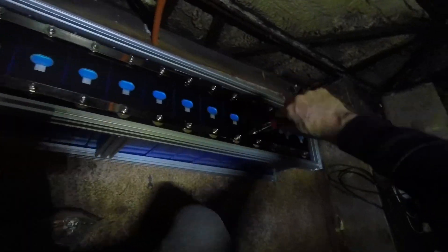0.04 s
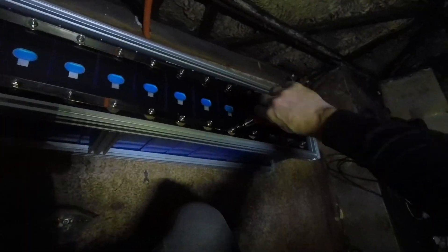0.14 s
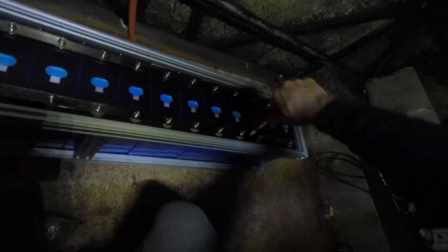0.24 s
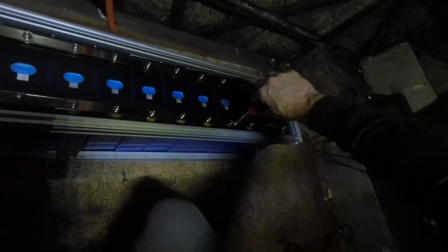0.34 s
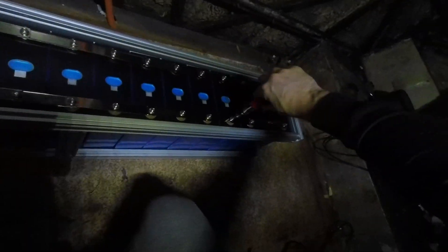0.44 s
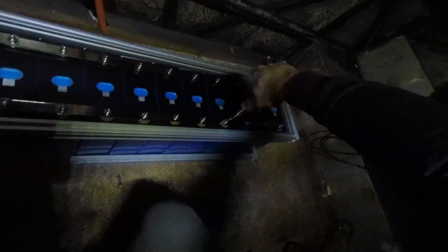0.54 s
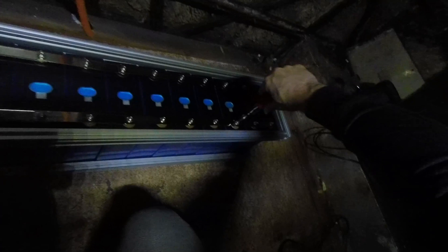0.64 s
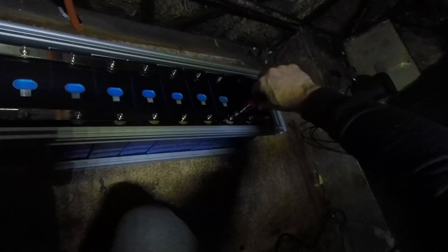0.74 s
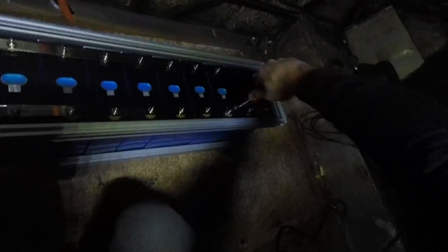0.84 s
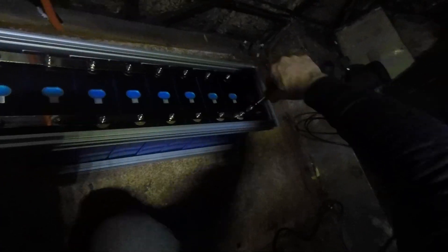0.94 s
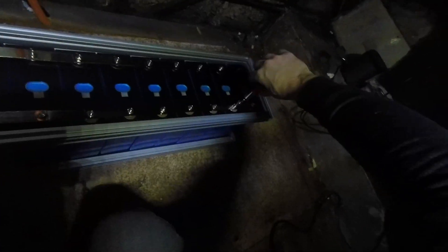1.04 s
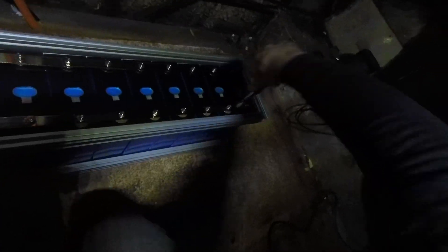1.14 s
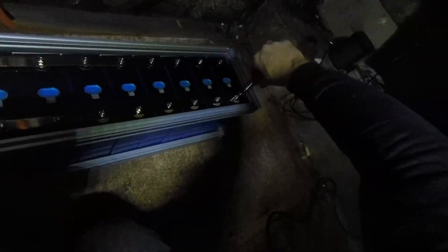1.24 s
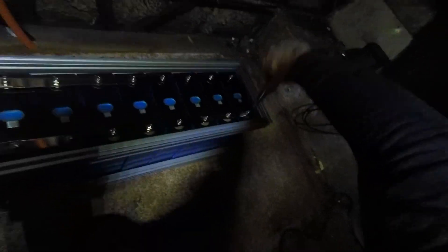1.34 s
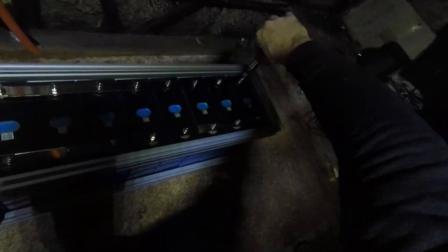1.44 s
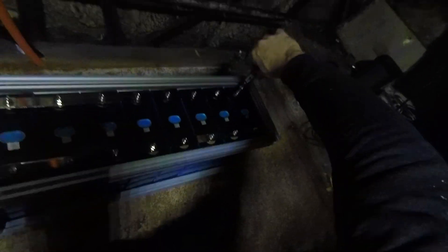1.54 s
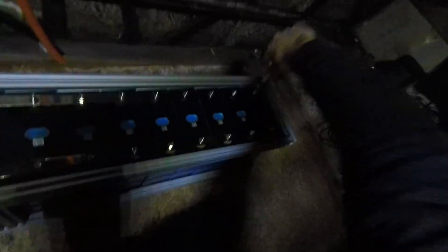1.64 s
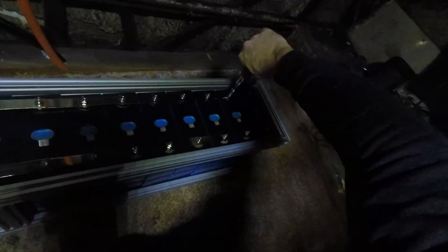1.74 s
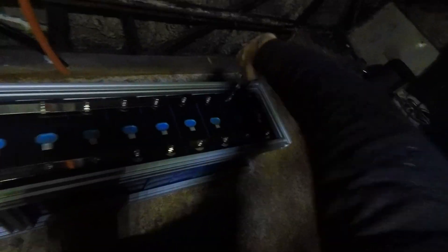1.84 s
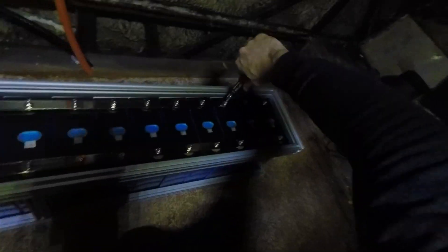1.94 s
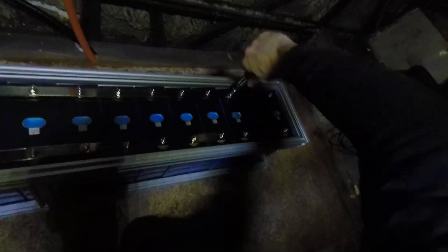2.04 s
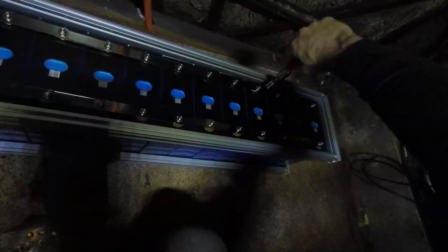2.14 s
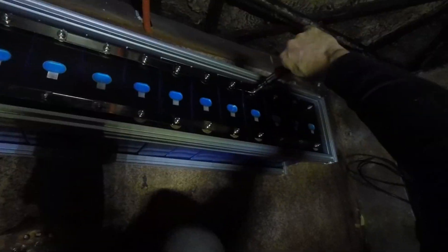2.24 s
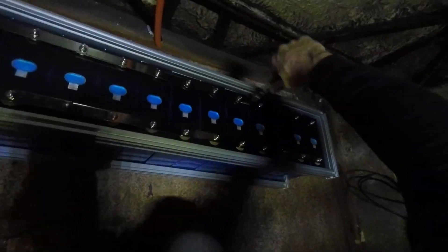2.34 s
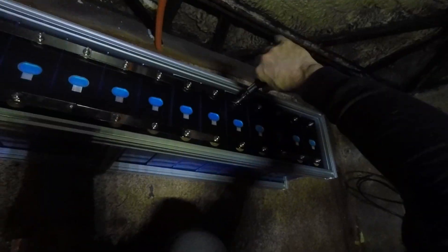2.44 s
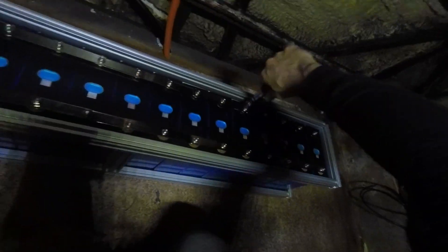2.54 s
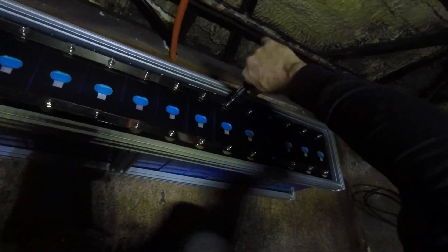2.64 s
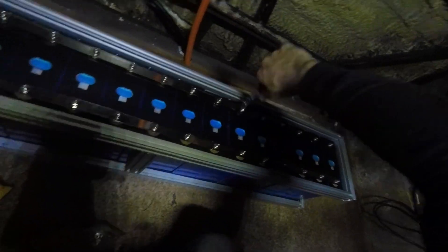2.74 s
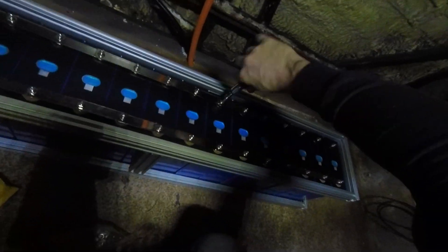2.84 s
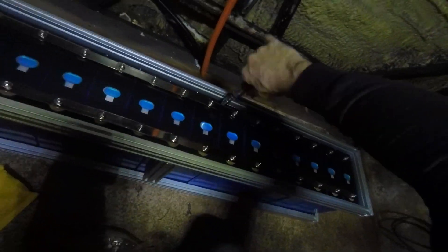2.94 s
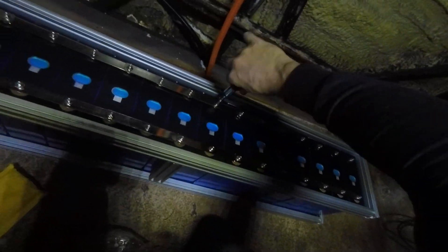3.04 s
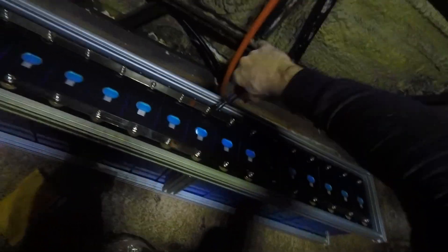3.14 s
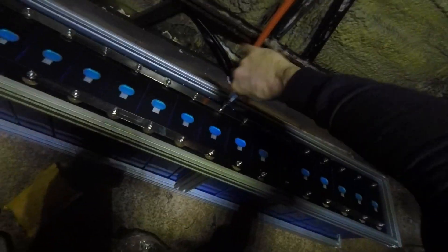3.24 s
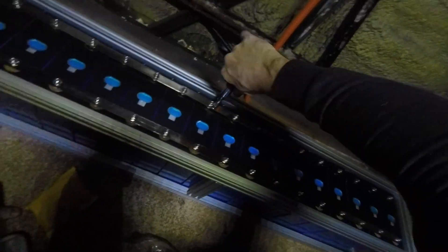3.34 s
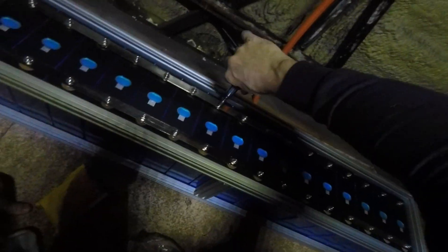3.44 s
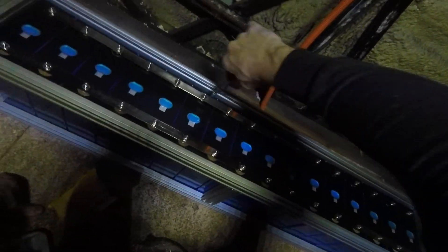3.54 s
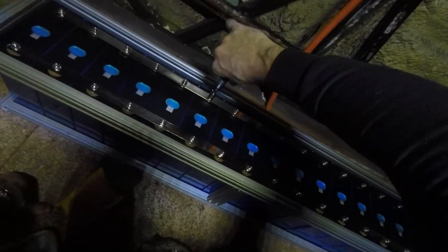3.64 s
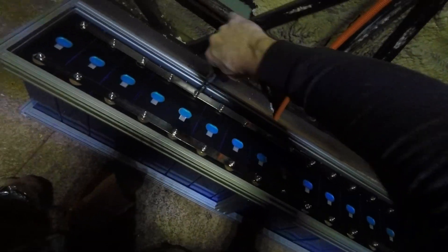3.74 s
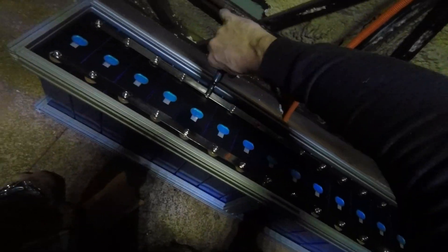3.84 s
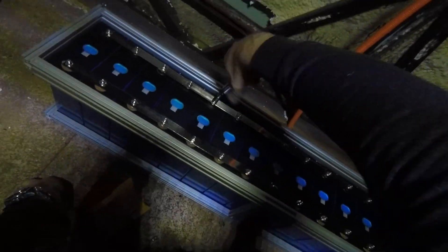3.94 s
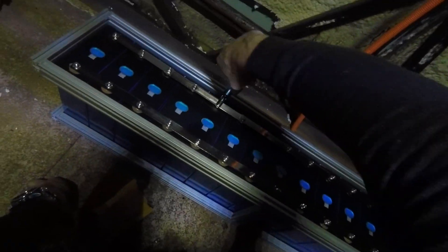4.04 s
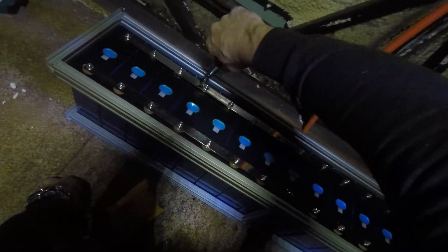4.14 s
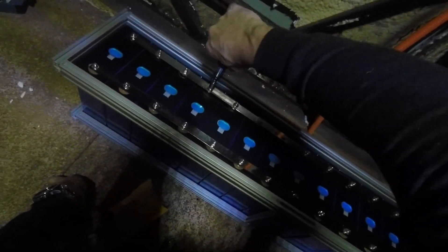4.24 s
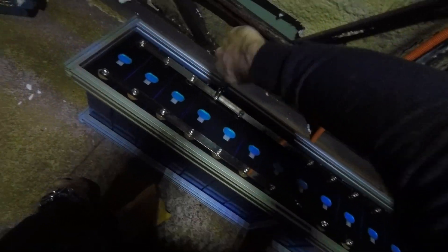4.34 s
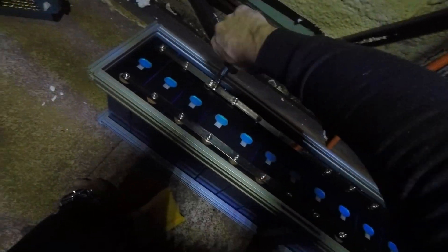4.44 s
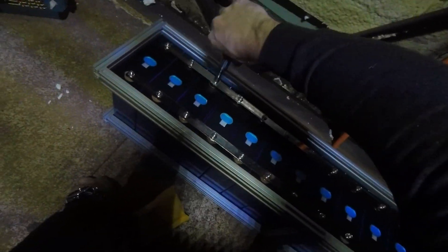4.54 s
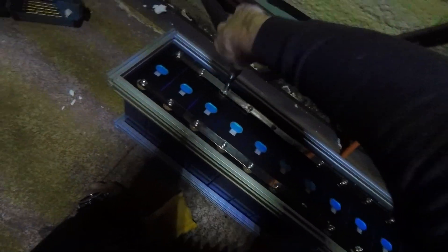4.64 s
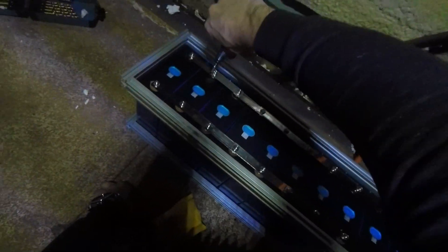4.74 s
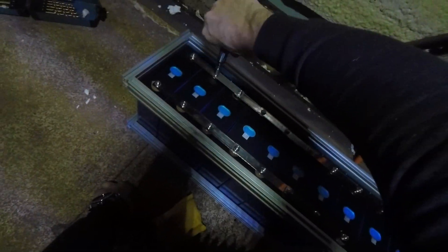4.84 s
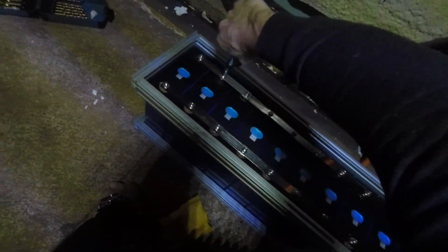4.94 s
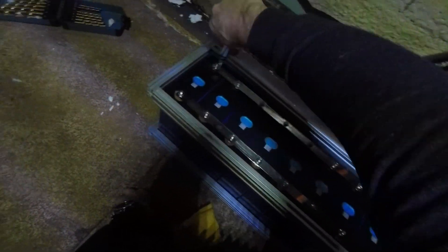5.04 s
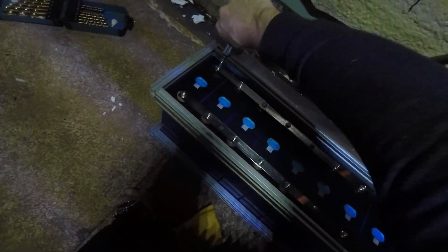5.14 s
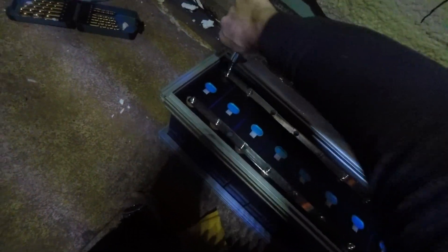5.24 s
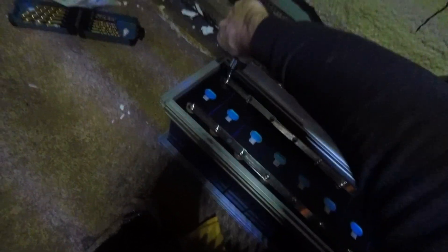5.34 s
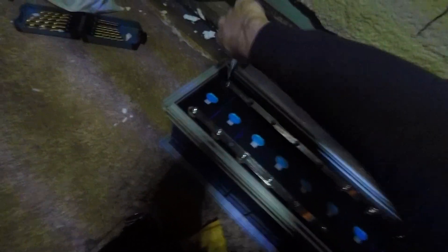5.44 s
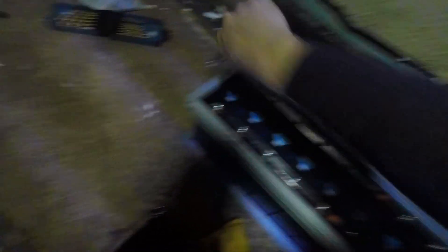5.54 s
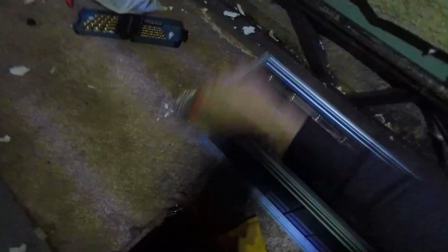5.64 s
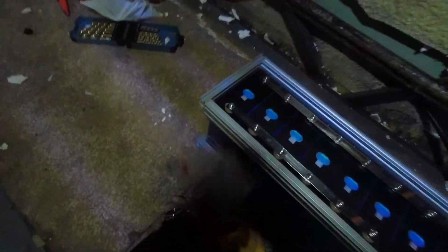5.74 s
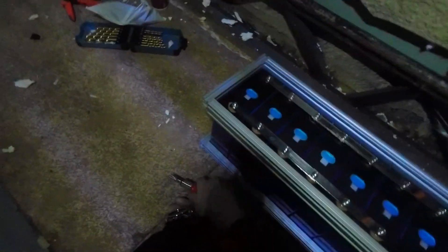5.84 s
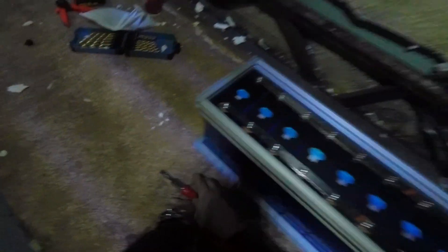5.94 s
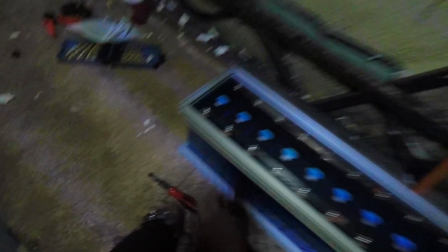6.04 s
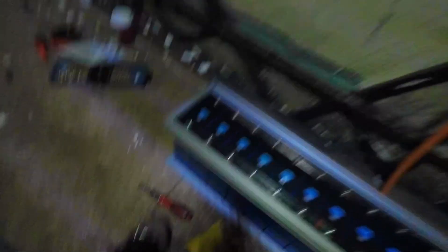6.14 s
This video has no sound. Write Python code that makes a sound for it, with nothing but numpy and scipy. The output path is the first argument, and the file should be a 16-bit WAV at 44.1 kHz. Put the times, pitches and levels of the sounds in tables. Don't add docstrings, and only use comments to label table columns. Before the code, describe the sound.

Outdoors at night, with a close body-worn microphone that sounds thin and dry, steel ticks and rattles in irregular clusters as a ratchet swings back and forth, with sharper snaps about twice a second. A brief stuttering creak comes early and a sleeve brushes faintly later. Thudding pulls follow, then a near pause with fuller, darker air, and one very loud hollow bang with a rocking, short rumble.

```python
import sys
import numpy as np
from scipy import signal
from scipy.fft import rfft, irfft
from scipy.io import wavfile

SR = 44100
rng = np.random.default_rng(int(sys.argv[2]) if len(sys.argv) > 2 else 0)


def store_wav(level_fs):
    pcm = np.round(np.clip(np.atleast_2d(level_fs), -1, 1) * 32767)
    wavfile.write(sys.argv[1], SR, pcm.T.astype(np.int16))


def linear_from_db(decibels):
    return 10 ** (np.asarray(decibels, float) / 20)


N = 273670
TIME_S = np.arange(N) / SR


def rms_one(x):
    return x / np.sqrt(np.mean(x ** 2) + 1e-20)


def band(x, low_hz, high_hz):
    limits = [low_hz, min(high_hz, 0.45 * SR)]
    return signal.sosfilt(signal.butter(2, limits, "band", fs=SR, output="sos"), x)


def lowpass(x, order, top_hz):
    return signal.sosfilt(signal.butter(order, top_hz, fs=SR, output="sos"), x)


def noise(spectrum):
    hz, db = np.transpose(spectrum)
    log_hz = np.log(np.fft.rfftfreq(N, 1 / SR) + 1)
    level_db = np.interp(log_hz, np.log(hz), db)
    level_db = level_db - 600 * np.maximum(log_hz - np.log(hz[-1]), 0)
    return rms_one(irfft(rfft(rng.standard_normal(N)) * linear_from_db(level_db), N))


def drift(rate_hz):
    r = np.exp(-2 * np.pi * rate_hz / SR)
    wander = signal.lfilter([1], [1, -2 * r, r * r], rng.standard_normal(N + SR))
    return rms_one(wander[SR:])


def strike(times, level_db, modes, spread_db, touch_s=0.0, after_db=-54.0, after_s=0.005,
           turning=None, firm=False):
    at = (np.asarray(times) * SR).astype(int)
    luck = rng.standard_normal((len(at), len(modes)))
    grit = rng.choice([-1.0, 1.0], N + len(modes))
    if firm:
        push = np.arange(int(5 * touch_s * SR) + len(modes))
        grit[np.add.outer(at, push)] = 1

    quick = np.exp(-1 / (touch_s * SR + 1e-9))
    slow = np.exp(-1 / (after_s * SR))
    rise = np.convolve([1, -quick], [1, -quick])
    burst = np.sqrt((1 - quick ** 2) ** 3 / (1 + quick ** 2))
    rattle = linear_from_db(after_db) * np.sqrt(1 - slow ** 2)
    force_top = burst * np.array([1, -slow, 0]) + rattle * rise
    force_bottom = np.convolve(rise, [1, -slow])

    out = np.zeros(N)
    for k, (hz, mode_db, t60) in enumerate(modes):
        hit_db = level_db + mode_db + spread_db * luck[:, k]
        if turning:
            hit_db = hit_db + turning(times, hz)
        clicks = np.full(N, 1e-18)
        np.add.at(clicks, at, linear_from_db(hit_db))
        force = signal.lfilter(force_top, force_bottom, clicks)
        if touch_s:
            force = force * grit[k:k + N]
        r = linear_from_db(-60 / (t60 * SR))
        w = 2 * np.pi * hz / SR
        out += signal.lfilter([0, np.sin(w)], [1, -2 * r * np.cos(w), r * r], force)
    return out


def scatter(x, t60, start_s):
    t = np.arange(int(0.15 * SR)) / SR
    tail = rng.standard_normal(len(t)) * linear_from_db(-60 * t / t60) * (t > start_s)
    return signal.fftconvolve(x, tail / np.sqrt(np.sum(tail ** 2)))[:N]


def second_mic_share():
    return np.clip((TIME_S - 5.267) / 0.003, 0, 1)


# f/Hz, level/dB
HANDLING_COLOUR = [(410, -22), (700, -3), (758, -9.5), (851, -6.5), (1850, -16), (3000, -22.5), (3900, -52),
                   (6600, -120)]
# f/Hz, level/dB
FIRST_AIR_COLOUR = [(1200, -17), (2000, -27), (3200, -1.5), (4500, -2.5), (9400, -6.5), (12800, -12),
                    (15000, -12), (15800, -21)]
# f/Hz, level/dB
OPEN_AIR_COLOUR = [(30, -6), (150, 0), (400, -6), (650, -13), (2200, -20), (4300, -32), (7000, -21),
                   (14800, -28)]


def night():
    handling = linear_from_db(-49.5 + 2.0 * drift(22)) * noise(HANDLING_COLOUR)
    air = linear_from_db(-57.5 + 0.25 * drift(3.4) + 0.85 * drift(55)) * noise(FIRST_AIR_COLOUR)
    open_air = linear_from_db(-46 + 1.5 * drift(8)) * noise(OPEN_AIR_COLOUR)
    since = TIME_S - BLOWS[0][0]
    duck_db = (-5 - 24 / (1 + np.exp((since - 0.11) / 0.011))) * (since > 0)
    share = second_mic_share()
    return (1 - share) * (handling + air) + share * open_air * linear_from_db(duck_db)


# f/Hz, level/dB
WIND_COLOUR = [(12, -62), (20, -6), (75, 3.5), (129, 2), (354, -9), (560, -14), (780, -52), (1320, -120)]
# t/s, level/dB
WIND_GUSTS = [(0.0, -76.5), (2.12, -74.5), (2.18, -77), (2.54, -73.5), (2.59, -78), (3.3, -75), (3.45, -77),
              (3.65, -77), (5.21, -74), (5.25, -69)]


def wind():
    gust_db = np.interp(TIME_S, *np.transpose(WIND_GUSTS))
    return linear_from_db(4.7 + gust_db + 2.0 * drift(13.0)) * noise(WIND_COLOUR)


# start t/s, length t/s, low f/Hz, high f/Hz, level/dB
SLEEVE_BRUSHES = [
    (3.05, .14, 8500, 11500, -55),
    (4.15, .05, 6500, 11000, -48),
    (1.02, .06, 4000, 9000, -56),
    (3.7, .05, 5000, 10000, -58),
]


def rustles():
    grain = rng.standard_normal(N) * linear_from_db(2.7 * drift(200))
    out = np.zeros(N)
    for start, length, low_hz, high_hz, level_db in SLEEVE_BRUSHES:
        swell = np.sin(np.pi * np.clip((TIME_S - start) / length, 0, 1))
        out += linear_from_db(level_db) * swell * rms_one(band(grain, low_hz, high_hz))
    return out


# start t/s, length t/s, first f/Hz, last f/Hz, level/dB
JOINT_SQUEAKS = [
    (0.214, .02, 5600, 6600, -54),
    (0.543, .022, 9400, 11200, -45),
    (0.602, 0.018, 5800, 5800, -50.5),
    (0.634, .035, 7100, 15000, -44),
    (0.645, 0.046, 11000, 11000, -46),
]


def squeaks():
    out = np.zeros(N)
    for start, length, first_hz, last_hz, level_db in JOINT_SQUEAKS:
        part = np.clip((TIME_S - start) / length, 0, 1)
        swell = 2 * np.sqrt(part * (1 - part))
        cycles = length * (first_hz * part + 0.5 * (last_hz - first_hz) * part ** 2)
        out += linear_from_db(level_db) * swell * np.sin(2 * np.pi * cycles)
    return out * drift(380)


# f/Hz, width f/Hz, level/dB
CREAK_MODES = [(725, 300, -3.5), (1170, 360, 1), (1330, 218, -1), (1566, 300, -8), (2330, 1200, -13.5)]
# start t/s, length t/s, first slip rate f/Hz, last slip rate f/Hz, level/dB
CREAK_DRAGS = [
    (.5232, 0.0037, 170, 170, -22),
    (.529, 0.0055, 170, 160, -20),
    (0.535, .006, 530, 520, -29),
    (0.545, 0.023, 530, 482, -22.5),
    (0.6035, 0.027, 255, 240, -23),
    (0.632, 0.013, 330, 310, -27),
    (.6455, 0.0028, 200, 207, -22),
    (0.6517, 0.023, 230, 250, -24),
    (0.673, 0.0082, 500, 430, -28.5),
]


def creak():
    attack_s, release_s = 0.0019, 0.0035
    slips_per_s, level = np.full(N, 300.0), np.zeros(N)
    for start, length, first, last, level_db in CREAK_DRAGS:
        since = TIME_S - start
        rate = np.interp(since, [0, length], [first, last])
        slips_per_s = np.where(since >= -attack_s, rate, slips_per_s)
        shape = np.interp(since, [-attack_s, attack_s, length, length + release_s], [0, 1, 1, 0])
        sag_db = -2.5 * np.clip(since / length, 0, 2)
        level = np.maximum(level, linear_from_db(level_db + sag_db) * shape ** 2)

    uneven = 0.12 * (slips_per_s < 420)
    turns = np.cumsum(slips_per_s * linear_from_db(6.0 * uneven * drift(150)) / SR)
    for start, *_ in CREAK_DRAGS:
        i = int(start * SR)
        turns[i:] += np.ceil(turns[i]) - turns[i]
    slips = np.diff(np.floor(turns), prepend=0) * linear_from_db((1.5 + 9.0 * uneven) * drift(300))

    body = np.zeros(N)
    for k, (hz, width_hz, top_db) in enumerate(CREAK_MODES):
        r = np.exp(-np.pi * width_hz / SR)
        resonance = [1, -2 * r * np.cos(2 * np.pi * hz / SR), r * r]
        body += (-1) ** k * linear_from_db(top_db) * signal.lfilter([1, 0, -1], resonance, slips)
    return level * rms_one(lowpass(body, 3, 2300))


# t/s, level/dB
ROCKING_PUSHES = [
    (5.909, -29),
    (5.946, -15.5),
    (5.975, -11),
    (6.001, -12.5),
    (6.04, -26),
    (6.105, -17.5),
    (6.129, -32),
    (6.154, -31),
]
# f/Hz, level/dB, 60 dB fade t/s
HOLLOW_MODES = [(167.4, -13, 0.16), (195.8, 2.5, 0.1)]


def rocking():
    push_s, push_db = np.transpose(ROCKING_PUSHES)
    return lowpass(strike(push_s, push_db, HOLLOW_MODES, spread_db=2.5), 3, 260)


# low f/Hz, high f/Hz, level/dB, 60 dB fade t/s
CASE_RUMBLE = [(145, 237, -18, 0.63), (250, 374, -21.5, 0.52), (510, 900, -17.5, 0.38),
               (1050, 1640, -34, 0.57), (1700, 2700, -41, 0.53), (3400, 5100, -38.5, 0.17),
               (5950, 9100, -39, 0.058)]


def rumble():
    since = np.maximum(TIME_S - BLOWS[0][0], 0)
    out = np.zeros(N)
    for low_hz, high_hz, level_db, t60 in CASE_RUMBLE:
        out += rms_one(band(rng.standard_normal(N), low_hz, high_hz)) * linear_from_db(level_db - 60 * since / t60)
    return out * (1 - np.exp(-since / 0.001))


# t/s, crack level/dB, boom level/dB, wall level/dB
BLOWS = [
    (5.8811, -3.5, -17.5, -10.5),
    (5.8984, -18, -13.5, 0.5),
    (5.923, -41, -15, -19),
    (5.8836, -19, -3.5, -6),
    (6.097, -58, -51, -63),
]
# f/Hz, level/dB, 60 dB fade t/s
BOOM_MODES = [(142, -0.5, 0.12), (189, -6, 0.31), (198.6, 5, 0.23), (272, -16.5, 0.62), (317, -4, 0.13),
              (388, -1, 0.15), (456, -5.5, 0.13)]
WALL_MODES = [(540, -20, 0.053), (670, 3.5, 0.018), (730, -18, 0.02), (1060, 9, 0.0083), (1240, 4.5, 0.015),
              (1520, -7, 0.027), (2130, -19, 0.056)]
CRACK_MODES = [(3240, 7, 0.008), (4160, -5, 0.0061), (5000, 0.5, 0.0057), (5680, -2, 0.015),
               (8200, -12.5, 0.0095), (10800, -11.5, 0.0025)]
PANEL_MODES = [(574, -3, 0.25), (714, -6, 0.087), (820, 0, 0.15), (980, -19, 0.17), (990, -18, 0.14),
               (1290, -12, 0.22), (1405, -8, 0.2), (1610, -15, 0.19), (1845, -8, 0.15), (1960, -15, 0.24),
               (2300, -10.5, 0.18), (2690, -17, 0.14)]


def knock():
    s, crack_db, boom_db, wall_db = np.transpose(BLOWS)
    boom = lowpass(strike(s + 0.00091, boom_db - 6.0, BOOM_MODES, spread_db=2.0), 2, 900)
    walls = strike(s, wall_db - 19.0, WALL_MODES, spread_db=3.5, touch_s=0.00006, firm=True)
    panels = strike(s, wall_db - 27, PANEL_MODES, spread_db=0.5, touch_s=0.00078,
                    after_db=-1.5, after_s=0.013)
    crack = strike(s, crack_db - 13.5, CRACK_MODES, spread_db=1.0, touch_s=0.00037,
                   after_db=-2.0, after_s=0.0027)
    struck = boom + band(walls, 343, 4100) + panels + band(crack, 2700, 14000)
    return struck + rocking() + rumble()


# t/s, lower favoured f/Hz, upper favoured f/Hz, upper minus lower level/dB
TOOL_FACING = [(.1, 5030, 8300, -3), (.5, 5470, 8300, -1), (.8, 4800, 9800, -8), (1.05, 5000, 9100, -2),
               (1.3, 5000, 7850, 0.5), (1.45, 5730, 7700, -14), (1.8, 6020, 7760, -2.5),
               (2.3, 6740, 8950, -11.5), (2.85, 6850, 9100, -4.5), (3.05, 5600, 9000, 2),
               (3.22, 5700, 8930, 5), (3.4, 6200, 9300, -0.5), (3.8, 6570, 9150, 2), (4.13, 5770, 8100, -2),
               (4.17, 6400, 8200, 5), (4.6, 5000, 8100, 10.5), (5.2, 4900, 8350, 9), (5.35, 4960, 6950, -5)]


def facing_db(s, hz):
    at, *columns = np.transpose(TOOL_FACING)
    low_hz, high_hz, lean_db = [np.interp(s, at, column) for column in columns]

    def near(centre_hz):
        return np.exp(-0.5 * (np.log2(hz / centre_hz) / 0.089) ** 2)

    return (6.5 - 0.5 * lean_db) * near(low_hz) + (6.5 + 0.5 * lean_db) * near(high_hz)


# t/s, favoured f/Hz, lift level/dB
NUT_SPOTS = [(.1, 1060, 9.5), (.4, 876, 2), (.9, 950, -2), (1.25, 1160, 12), (1.56, 1170, 13.5),
             (1.75, 1046, 7.5), (2.0, 750, 0.5), (2.26, 830, -2.5), (2.65, 760, 7.5), (2.86, 806, 5.5),
             (3.6, 870, 5.5), (4.2, 777, 5.5), (4.8, 820, 11.5), (5.2, 806, 9.5)]


def rack_spot_db(s, hz):
    at, spot_hz, lift_db = np.transpose(NUT_SPOTS)
    octaves_off = np.log2(hz / np.interp(s, at, spot_hz))
    return np.interp(s, at, lift_db) * np.exp(-0.5 * (octaves_off / 0.093) ** 2)


# t/s, then pawl, socket, rack and edge level/dB
SNAPS = [(0.3512, -29, -43, -53, -26), (0.8008, -19, -28, -30.5, -25), (1.2449, -26.5, -27, -31.5, -25),
         (1.4415, -23.5, -34, -30, -27.5), (1.558, -17.5, -35, -25, -19), (1.7831, -31, -40, -33, -28),
         (1.9666, -22, -34, -32.5, -24.5), (2.009, -21, -29.5, -19, -23.5), (2.2573, -33, -36, -24, -27),
         (2.4572, -18, -26, -29.5, -26.5), (2.6544, -15, -36, -31, -27), (2.8567, -21.5, -30, -26.5, -18.5),
         (3.0217, -28.5, -51, -36, -30), (3.2204, -19.5, -33, -27, -18), (3.344, -23.5, -40, -35, -27.5),
         (3.432, -19, -37, -28, -35), (3.7705, -26.5, -31, -32.5, -33.5), (3.8639, -25, -32.5, -35, -26),
         (4.1637, -31, -34, -34.5, -20), (4.1685, -17, -43, -32, -19), (4.2285, -31, -40, -34.5, -23),
         (4.555, -22.5, -55, -30, -19), (5.3512, -31, -30, -66, -49), (4.2254, -24.5, -36, -40, -26)]
# t/s, then pawl, socket and rack level/dB
SEATS = [(.0996, -33, -33.5, -49), (0.1401, -32.5, -39, -32), (.3005, -27, -26, -33),
         (.3178, -24.5, -26, -29), (0.3285, -28, -34.5, -37), (0.4186, -30.5, -36, -37.5),
         (0.4876, -22, -19.5, -28), (0.6723, -32.5, -29.5, -61), (0.7499, -24.5, -25, -40),
         (0.9939, -35.5, -34, -50), (1.2086, -27.5, -24, -33.5), (1.736, -23.5, -31.5, -34.5),
         (1.7572, -28, -34, -44), (1.9611, -22.5, -26, -32), (2.1852, -24.5, -25.5, -26),
         (2.22, -34, -41, -62), (2.409, -23, -30.5, -33.5), (2.6136, -25.5, -25, -34.5),
         (2.6214, -29.5, -31, -37), (2.8333, -34, -35.5, -37), (3.0131, -28.5, -27, -42.5),
         (3.1803, -24.5, -23.5, -36), (3.1841, -31, -34, -48), (3.3585, -25.5, -39, -36),
         (3.5821, -30.5, -31.5, -32.5), (3.6119, -22, -29, -28), (3.8301, -32, -30.5, -48),
         (4.1253, -25, -26, -34.5), (4.5124, -29, -36, -36), (1.752, -33, -31.5, -52),
         (.121, -54, -54, -36), (1.612, -58, -58, -36), (1.868, -41, -59, -37)]
# t/s, then pawl, socket and rack level/dB
PULLS = [(4.4418, -25, -39, -37), (4.4508, -39, -39, -32), (4.5581, -54, -52, -57),
         (4.583, -31.5, -45, -35.5), (4.7255, -26, -25, -31.5), (4.7417, -28, -38, -34.5),
         (4.7976, -24.5, -34, -31.5), (4.8366, -18, -29, -29), (4.917, -19, -33, -27),
         (5.0503, -28.5, -58, -27.5), (5.1157, -33.5, -39.5, -32.5), (5.15, -27, -40, -25.5),
         (5.1584, -26.5, -54, -24.5), (5.1898, -19.5, -29.5, -16.5), (5.2134, -29, -46, -28.5)]
# t/s, pawl level/dB
TEETH = [(.1046, -31.5), (.3465, -33), (.5657, -38), (.6459, -47), (.6521, -52), (1.0291, -35),
         (1.0573, -35), (1.489, -32), (1.4966, -27.5), (1.503, -31.5), (1.5146, -34.5), (1.5242, -31.5),
         (1.8274, -40), (2.2458, -33.5), (2.2507, -39), (2.7381, -36.5), (2.803, -30), (2.8884, -41),
         (3.0713, -38), (3.2966, -33.5), (3.4665, -29), (3.4748, -38), (4.0763, -37.5), (4.1557, -27),
         (4.1896, -30), (4.2775, -31), (4.3539, -35.5), (4.4679, -38), (4.6044, -48), (5.0442, -28)]
# t/s, pawl level/dB
CHATTER = [(.1244, -40), (.3356, -36), (.4247, -34.5), (.4497, -34.5), (.9872, -38), (1.0146, -36),
           (1.2178, -34.5), (1.2259, -39), (1.2367, -36), (1.4586, -32), (1.4865, -47), (2.1999, -36),
           (2.2246, -45), (2.2312, -43), (2.2769, -36), (2.4241, -36), (.7545, -27), (2.8239, -38),
           (3.4265, -29), (3.443, -38), (3.6211, -32), (3.6295, -37), (3.644, -49), (3.6501, -34),
           (3.7766, -39), (3.8265, -43), (4.1384, -32.5), (4.508, -34.5), (3.3685, -37), (5.0849, -44)]
# t/s, pawl level/dB
RATTLES = [(.1807, -40.5), (.211, -44), (.544, -48), (.6354, -43), (1.0502, -35), (1.2881, -37.5),
           (1.3398, -35.5), (1.6415, -44), (2.0975, -49), (2.3345, -42.5), (2.5393, -51), (2.6949, -42),
           (2.9302, -42.5), (3.0648, -35.5), (3.1143, -39.5), (3.2928, -50), (3.5195, -43.5),
           (3.7095, -42.5), (3.8129, -37), (3.9435, -43), (3.9677, -42), (3.9892, -41), (4.3136, -37),
           (4.3379, -49), (4.3434, -42), (4.3937, -40), (4.6503, -42), (4.8222, -47), (5.0008, -55)]
# t/s, pawl level/dB
REBOUNDS = [(.4152, -30.5), (.6607, -46), (.6652, -40), (.7133, -42), (.8245, -31.5), (.8381, -45),
            (1.2729, -37), (1.5725, -41), (1.5893, -48), (2.031, -41), (2.037, -40), (2.2858, -45),
            (2.4176, -43), (2.4796, -41), (2.485, -38), (2.534, -46.5), (2.6703, -57), (2.680, -35.5),
            (2.7325, -41), (2.8791, -34), (3.0375, -44), (3.2142, -46), (3.244, -36), (3.2476, -33),
            (3.7056, -54), (3.8222, -49), (3.8797, -39), (3.898, -47), (3.9588, -45), (4.143, -45),
            (4.2608, -45), (4.281, -33), (4.5498, -26.5), (4.5886, -42), (4.6011, -41), (4.9954, -46),
            (5.349, -36), (5.3535, -29), (6.0185, -44), (5.367, -44), (5.5556, -46)]
# socket, rack and edge level/dB
TOOTH_SHARES = (-12.5, -12, -0.53)
CHATTER_SHARES = (-5, -4.4, 0.7)
RATTLE_SHARES = (-7.5, -10, -2.5)


def contacts():
    rows = list(SNAPS)
    rows += [(*seat, seat[1] - 3) for seat in SEATS]
    rows += [(*pull, pull[1] - 0.5) for pull in PULLS]
    grazes = [(hit[0] - 0.002, hit[1] - 22.5) for hit in list(SNAPS) + list(PULLS)]
    loose = list(RATTLES) + list(REBOUNDS) + grazes
    for events, shares in [(TEETH, TOOTH_SHARES), (CHATTER, CHATTER_SHARES), (loose, RATTLE_SHARES)]:
        rows += [(s, db, *(db + np.array(shares))) for s, db in events]
    return np.transpose(rows)


def spikes(s, pawl_db):
    clicks = np.zeros(N)
    np.add.at(clicks, (s * SR).astype(int), linear_from_db(-29 + 1.35 * (pawl_db + 31)))
    echo_path_m, sound_m_per_s = 0.039, 343
    echo = 0.75 * np.roll(clicks, round(echo_path_m / sound_m_per_s * SR))
    return band(clicks + echo, 2050, 17600)


# f/Hz, level/dB, 60 dB fade t/s
PAWL_MODES = [(4580, -10.5, 0.0095), (4900, -7.5, 0.0078), (5470, -5.5, 0.0066), (5982, -2.5, 0.0045),
              (6377, -1, 0.0047), (6830, -3, 0.0052), (7326, -0.5, 0.0056), (7750, -1, 0.0053),
              (8300, -4, 0.0055), (8680, 0, 0.0035)]
EDGE_MODES = [(9740, 2.5, 0.0066), (10220, 8.5, 0.0028), (12000, 5, 0.0032), (13750, -4, .004),
              (13800, -7, 0.01), (14840, 2.5, 0.0032), (15900, -7, 0.0039)]
SOCKET_MODES = [(2674, -14.5, 0.032), (2943, -32, 0.023), (3145, 6, 0.0067), (3287, -0.5, 0.013),
                (3570, -2, 0.0063)]
RACK_MODES = [(760.3, 7, 0.022), (842, -10, 0.055), (970, 7.5, 0.013), (1136, -5.5, 0.059),
              (1440, 0, 0.019), (1600, -4.5, 0.05), (1990, 7.5, 0.0075)]


def ratchet():
    s, pawl_db, socket_db, rack_db, edge_db = contacts()
    touch = s - 0.0003
    pawl = strike(touch, pawl_db + 0.5, PAWL_MODES, spread_db=2.0, touch_s=0.000086,
                  after_db=-6.5, after_s=0.0063, turning=facing_db)
    edge = strike(touch, edge_db - 4.0, EDGE_MODES, spread_db=1.0, touch_s=0.000089,
                  after_db=-7.0, after_s=0.0036, turning=facing_db)
    socket = strike(touch, socket_db - 3.5, SOCKET_MODES, spread_db=4.0, touch_s=0.00022,
                    after_db=-1.0, after_s=0.0061)
    thud = strike(s + 0.00121, rack_db - 20.5, RACK_MODES, spread_db=3.5, touch_s=0.00009,
                  after_db=-2.5, after_s=0.011, turning=rack_spot_db, firm=True)
    steel = band(pawl, 4620, 8700) + band(edge, 8400, 21000) + band(socket, 840, 4200)
    reflections = linear_from_db(-13.5) * scatter(steel, 0.039, 0.0024)
    return steel + band(thud, 473, 3900) + spikes(s, pawl_db) + reflections


def scene():
    return (night() + rustles() + squeaks() + creak() + knock() + ratchet())[None]


def bass_cut(x, cut_hz):
    return signal.sosfiltfilt(signal.cheby1(4, 0.5, cut_hz, "high", fs=SR, output="sos"), x)


def top_cut(x):
    return signal.sosfilt(signal.butter(12, 17140, fs=SR, output="sos"), x)


def record(dry):
    loud = np.clip(dry, -1.3, 1.3)
    windy = bass_cut(loud, 772.4) + linear_from_db(-25.0) * band(loud, 223, 517) + wind()
    calm = bass_cut(loud, 150) + linear_from_db(-16.0) * band(loud, 21, 65) + linear_from_db(-25) * band(loud, 75, 110)
    calm = np.clip(lowpass(calm, 2, 10000), -0.95, 0.95)
    calm = signal.sosfilt(signal.cheby2(8, 40, 16000, fs=SR, output="sos"), calm)
    share = second_mic_share()
    mixed = (1 - share) * windy + share * calm
    mixed = signal.sosfilt(signal.cheby2(10, 50, 17200, fs=SR, output="sos"), mixed)
    return top_cut(np.clip(mixed, -1, 1))


dry = scene()
out = record(dry)
store_wav(out)
```